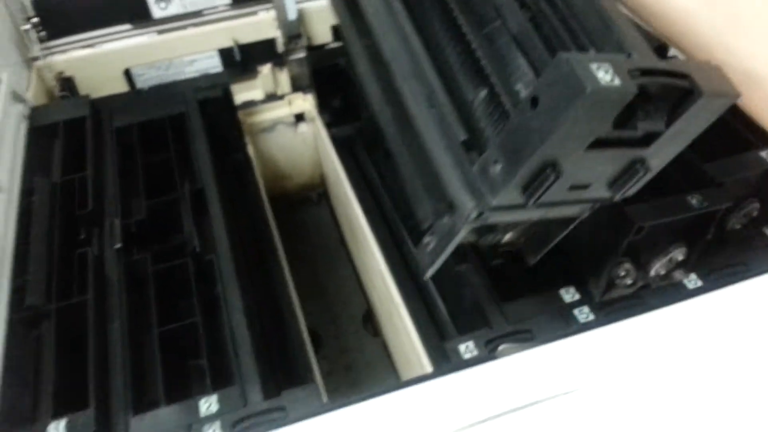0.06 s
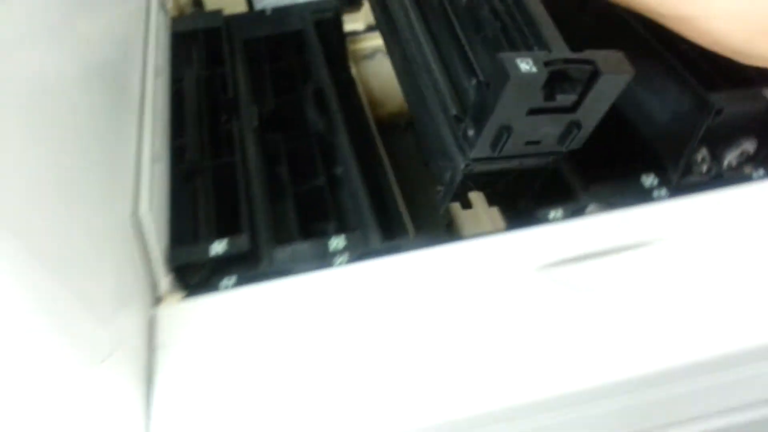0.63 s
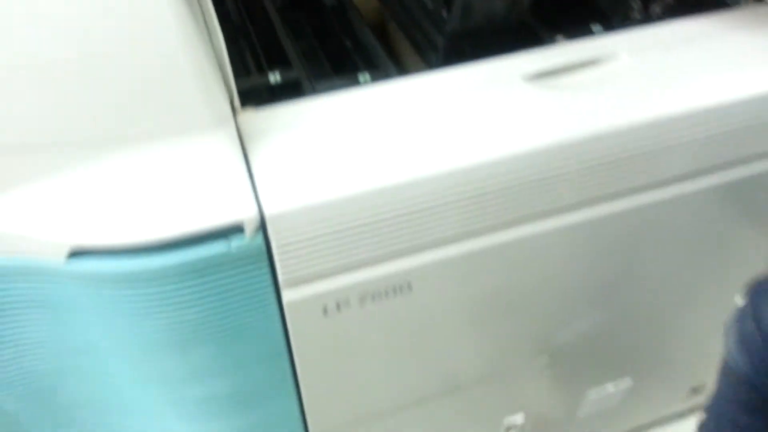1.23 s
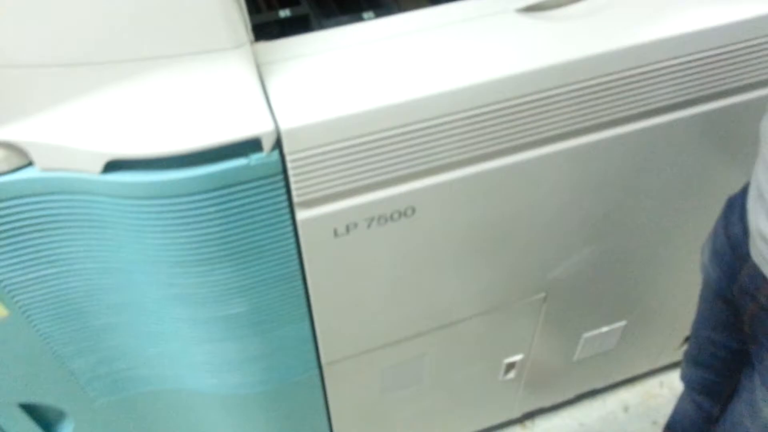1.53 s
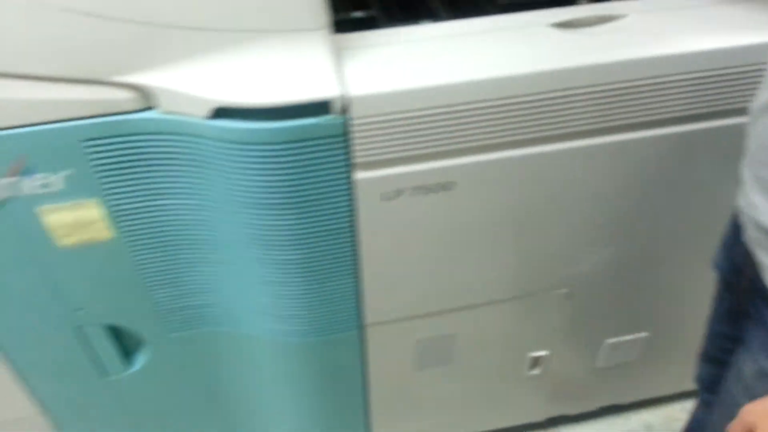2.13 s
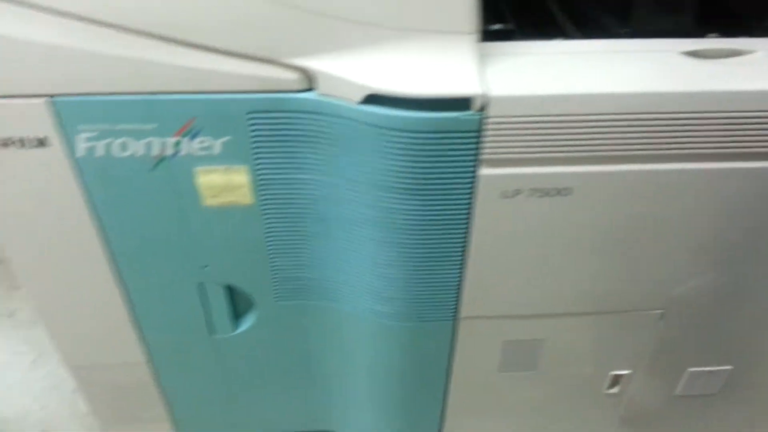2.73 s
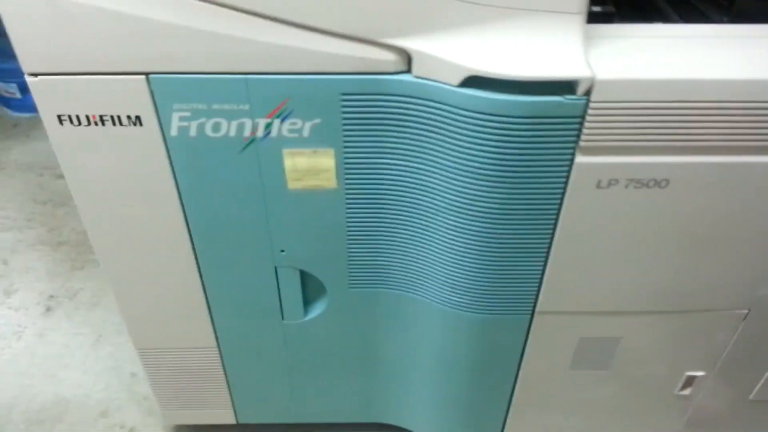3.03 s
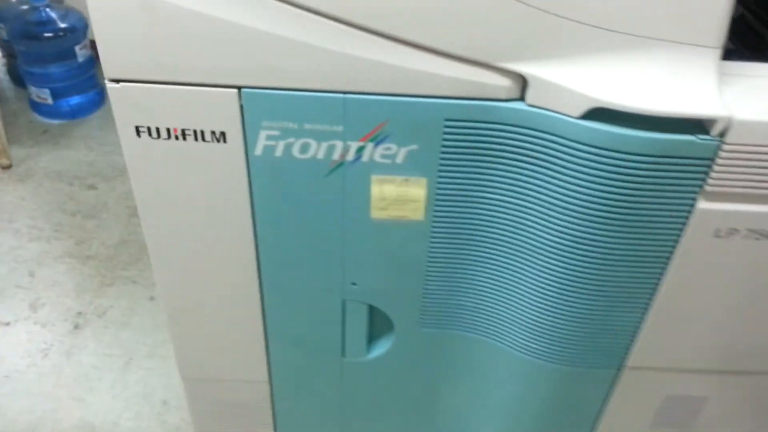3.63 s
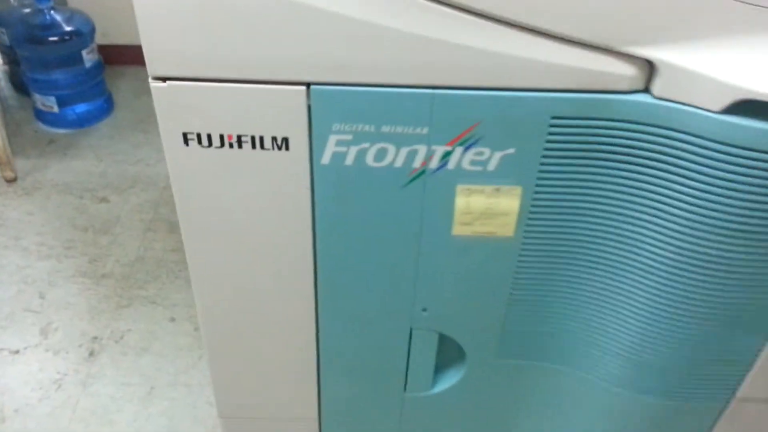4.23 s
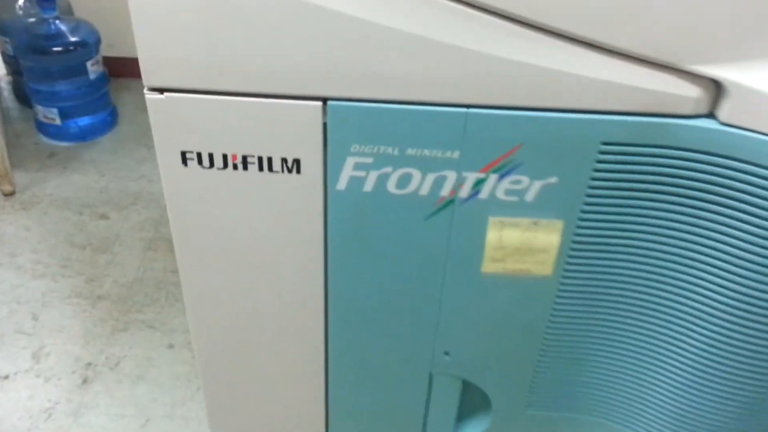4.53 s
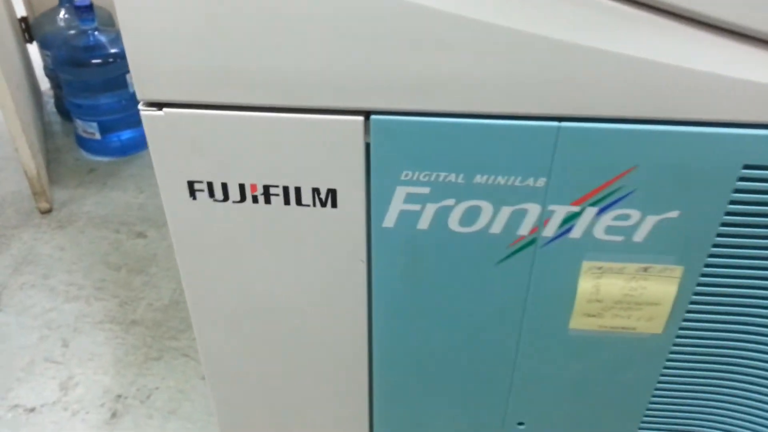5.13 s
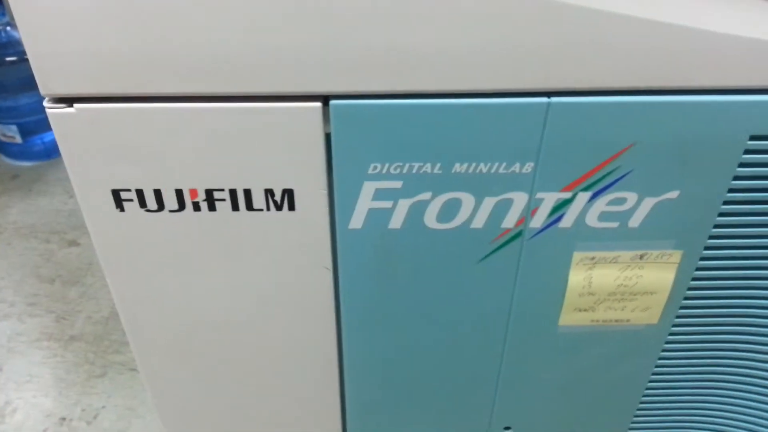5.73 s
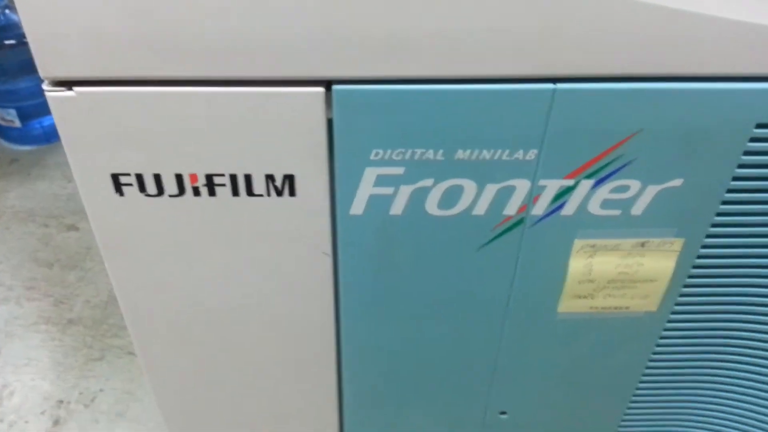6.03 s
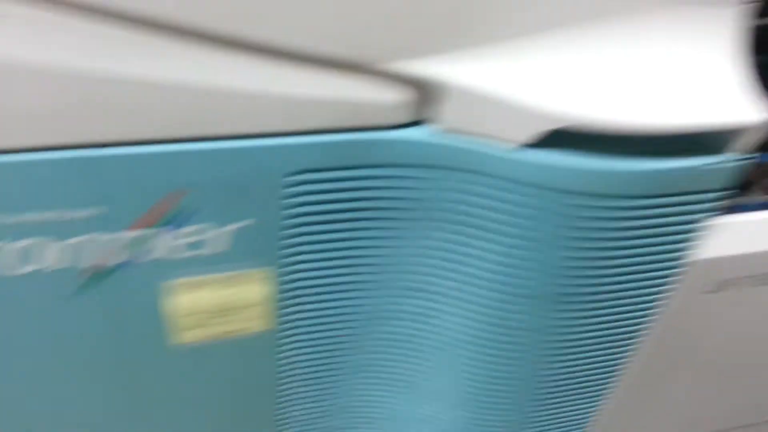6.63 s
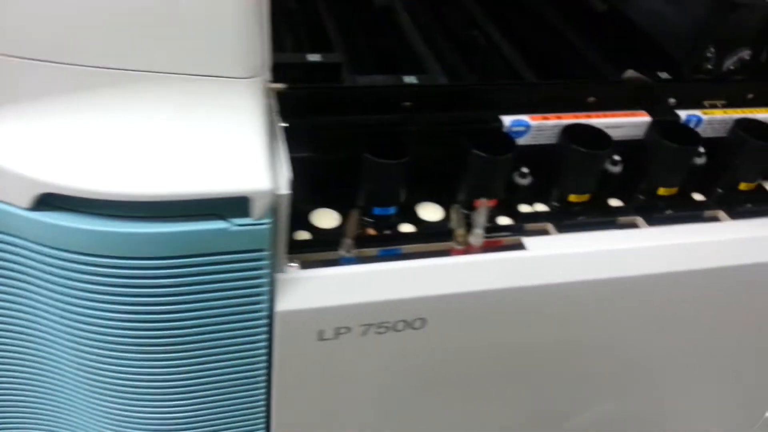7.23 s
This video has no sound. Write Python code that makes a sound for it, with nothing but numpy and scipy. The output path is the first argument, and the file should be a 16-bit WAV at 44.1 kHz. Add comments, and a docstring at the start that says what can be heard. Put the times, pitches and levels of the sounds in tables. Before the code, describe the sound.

In a workshop with a faint rush of ventilation, plastic racks clatter against a machine's housing. Quick, irregular knocks each trail a short rattle and a slight ring, with jostling in between. The bright clicks give way to hollower knocks, moving from the centre to the left. After about five seconds it quiets to small taps, plastic sliding on plastic and a few ticks from the hand-held recorder's case close to the microphones.

```python
"""Plastic racks in a workshop

Hard plastic racks are lifted, knocked and seated in the housing of a large machine. Each knock is a
graze, a hit and a rattle of loose parts, ringing in the ribbed rack, the housing and the room; between
knocks the racks jostle and slide. The hand-held stereo recorder turns away, so the racks drift to its
left. Close to the microphones its case ticks softly in the grip; ventilation hums behind."""
import sys
import numpy as np
from scipy import signal
from scipy.fft import rfft, irfft, next_fast_len
from scipy.io import wavfile

SR = 44100
rng = np.random.default_rng(int(sys.argv[2]) if len(sys.argv) > 2 else 0)


def dump(signal):
    """Clip the signal to [-1, 1] and save it as 16-bit WAV at the path in sys.argv[1]."""
    limited = np.clip(np.atleast_2d(signal).T, -1, 1)
    pcm = np.round(limited * 32767).astype(np.int16)
    wavfile.write(sys.argv[1], SR, pcm)


N = 321048
TIME = np.arange(N) / SR
PORT_DELAY_S = 0.00043   # sound's travel time between the two microphone ports
CUTOFF_HZ = 14800

# colour of the racks in their housing: (frequency [Hz], gain [dB])
RACK_COLOUR = [(40, -35), (90, -53), (160, -22.5), (280, -8), (360, -6.5), (700, 0), (1050, -1.5),
               (2100, 3), (2800, -1), (3700, 3), (4700, -4), (5700, -10), (10000, -15), (14000, -31.5)]
# where the racks lie, seen from the microphones: (time [s], bearing [sine of the angle to the left])
RACK_BEARING = [(0, 0.043), (2.2, 0.021), (2.55, 0.066), (3.2, 0.45), (4.03, 0.52), (4.65, 0.75),
                (5.7, 0.93), (6.5, 0.53), (7.28, 0.32)]


def knocks(rise_t60=0.0015, crack_t60=0.019, housing_t60=0.12, housing_db=5.5):
    """Each blow feeds the rack's crowded modes, heard directly and scattered by the housing."""
    # (time [s], graze before the hit [s], rattle length [s], main resonance [Hz],
    #  relative strength [dB], hardness [below 0 dull, above 0 bright])
    blows = [(0.688, 0.019, 0.29, 3700, 4.5, 0.9), (.943, 0.0032, 0.084, 1730, 10.5, -3),
             (1.079, 0.00042, 0.12, 4500, 16, 0.5), (1.094, 0.0011, 0.026, 4470, 19, 1.5),
             (1.111, 0.00066, 0.19, 2360, 19, 0.5), (1.206, 0, .38, 2180, 12, -.3),
             (1.44, 0.015, 0.11, 1680, 21, 0.75), (1.554, 0, 0.075, 1990, 13.5, -2.2),
             (1.788, 0.0087, 0.37, 855, 13.5, -1.5), (1.897, 0.017, 0.15, 1900, 22.5, 0.17),
             (2.059, 0.00068, 0.19, 870, 16.5, -1.7), (2.092, 0.013, 0.17, 1910, 26, -0.5),
             (2.173, 0, 0.05, 2700, 30.5, 0.45), (2.191, 0, 0.27, 2060, 23.5, -0.7),
             (2.355, .004, 0.12, 615, 25.5, -1.2), (2.394, 0.0036, 0.051, 684, 17.5, -1.5),
             (2.513, 0.032, 0.074, 2820, 25, -0.65), (2.536, 0.0031, 0.34, 720, 25, -1.5),
             (2.763, 0, 0.13, 975, 3.5, 1.5), (2.993, 0.0095, 0.083, 1490, 8.5, -2.5),
             (3.2, 0.0066, 0.14, 4160, 18, -1.5), (3.441, 0.0042, 0.21, 630, 15.5, -1.1),
             (3.479, 0.00078, 0.3, 1500, 15.5, -2.4), (3.602, 0.007, 0.18, 860, 22.5, -1.5),
             (3.744, 0.0083, 0.065, 3650, 6, -0.3), (3.873, 0, 0.13, 537, 9.5, -1),
             (3.89, 0.0012, 0.087, 445, 14.5, -3.5), (3.903, 0.016, 0.061, 500, 20.5, -3),
             (3.916, 0.0021, 0.16, 870, 19, -2), (4.03, 0.0034, 0.069, 880, 19, -2.2),
             (4.065, 0.0018, 0.1, 485, 17, -2.5), (4.312, 0.00084, 0.27, 1070, 4, 0),
             (4.6217, .003, 0.072, 1270, 27, 0.34), (4.665, 0, 0.24, 1140, 21, 0),
             (4.879, 0.0092, 0.12, 895, 22.5, -1.1), (4.957, .005, 0.29, 750, 22.5, -1.96),
             (4.97, 0, 0.075, 1270, 20.5, -1.7), (4.989, 0, 0.099, 530, 11, -6.5),
             (5.091, 0, 0.023, 810, 9, -3.5), (5.243, 0, 0.18, 766, 1, -5.5),
             (5.41, 0, 0.026, 1080, -3, -3.5), (5.727, 0.0089, 0.046, 740, 4.5, 2.5),
             (5.793, 0.0048, 0.038, 950, 0.5, -2), (5.991, 0, 0.11, 4270, 1.5, 0),
             (6.494, 0.0077, 0.11, 3030, 2, -2.5), (6.571, 0.011, 0.089, 940, 1, -2),
             (6.601, 0, 0.15, 1090, -5.5, -6), (6.913, 0.0044, 0.13, 4530, 2.5, -0.5)]
    out, t = np.zeros((2, N)), TIME[:2 ** 14]
    for s, graze_s, rattle_s, main_hz, db, hardness in blows:
        energy = dying(blow(t, graze_s, rattle_s, hardness), rise_t60)
        crack = rng.standard_normal(len(t)) * np.sqrt(dying(energy, crack_t60))
        scattered = diffuse(len(t)) * np.sqrt(dying(energy, housing_t60))
        knock = unit(from_racks(crack, s) + from_db(housing_db) * scattered)
        knock = coloured(knock, RACK_COLOUR, struck_spot(main_hz, hardness), hardened(hardness))
        add(out, s - graze_s, from_db(db) * knock)
    return out


def blow(t, graze_s, rattle_s, hardness, graze_db=-5.5, settle_db=-11, settle_t60=1, scuff_s=0.25):
    """Energy of one knock over time: graze, hit, dying rattle, and loose parts chattering on."""
    lead = round(graze_s * SR)
    since_hit = np.maximum(t - t[lead], 0)
    collisions = contacts(len(t), per_s=780, spread_db=1.0)
    swell = 1 - np.exp(-since_hit / (0.022 * rattle_s))   # long rattles swell for longer
    energy = shared_out(collisions * (swell * fade(since_hit, rattle_s)) ** 2, 0)
    energy += shared_out(collisions * (swell * fade(since_hit, settle_t60)) ** 2, settle_db)
    pressing = ((np.arange(lead) + 1) / (lead + 1)) ** 0.65   # the rack scrapes in ever harder
    energy[:lead] += shared_out(pressing, graze_db)
    # hard contacts put more into the first hit; a long scuff puts in less
    energy[lead] += from_db(1.5 * hardness) ** 2 / (1 + (rattle_s / scuff_s) ** 2)
    return energy


def struck_spot(main_hz, hardness, width=0.075):
    """Each spot of a rack favours one broad resonance and many narrow ones: (frequency [Hz], gain [dB])."""
    hz = 200 + 14000 * np.linspace(0, 1, num=170) ** 1.6
    narrow_db = rng.normal(-1, 3.2, len(hz))
    broad_db = (7 + 0.1 * hardness) / (1 + (np.log(hz / main_hz) / width) ** 2)
    return np.column_stack([hz, narrow_db + broad_db])


def hardened(hardness):
    """A harder contact tilts the sound towards the treble."""
    # (frequency [Hz], gain per unit of hardness [dB])
    tilt = [(150, -0.2), (330, -2), (800, -1.9), (1700, 0.5), (4000, 2.03), (9000, 2.5), (14800, 6)]
    return [(hz, hardness * db) for hz, db in tilt]


def jostling(touch_t60=0.11):
    """Light, soft touches of rack on housing come at random while it is moved."""
    # how hard the racks are jostled: (time [s], level [dB])
    effort = [(.6, -68), (1.0, -61), (1.22, -33.5), (1.38, -45.5), (1.63, -31.5), (2.0, -47), (2.32, -27.5),
              (2.68, -40), (2.94, -32.5), (3.15, -40.5), (3.28, -35), (3.55, -37), (3.8, -33.5),
              (4.2, -41.5), (5.5, -82)]
    touches = diffuse(N) * np.sqrt(dying(contacts(N, per_s=130, spread_db=2.0), touch_t60))
    touches = coloured(touches, RACK_COLOUR, hardened(-2.1))
    return from_db(np.interp(TIME, *np.transpose(effort))) * unit(touches) * np.sqrt(N)


def snaps():
    """Stiff plastic catches snap over an edge."""
    # (time [s], level [dB], pitch [Hz], t60 [s])
    catches = [(.6895, -25.5, 3700, 0.026), (1.0932, -4, 4020, 0.028), (1.1128, -10.5, 3550, 0.05),
               (1.439, -41, 9400, 0.032), (1.5532, -16, 2600, 0.044), (2.172, -14, 3340, 0.052),
               (3.469, -15, 10300, .025), (3.4775, -15, 10400, 0.039), (3.611, -29, 11500, 0.0083),
               (4.6228, -17, 3340, 0.033)]
    return slips(catches, width=1.49, scatter=1.0)


def ringing(hits):
    """Panels and rollers ring on at their own pitches."""
    # modes that outlast a knock: (frequency [Hz], relative gain [dB], t60 [s])
    modes = [(289, 10.5, 0.91), (672, -3.5, 0.66), (802, -11, 0.049), (1260, 6.5, 0.88), (1730, 16, 0.56),
             (2100, 5, 0.073), (2700, 10, 0.17), (3020, 7.5, 0.13), (3760, 1, 0.13), (4520, 8, 0.17),
             (6906, -19, .25), (7720, 13, 0.03)]
    out = 0
    for hz, db, t60 in modes:
        r = fade(1 / SR, t60)
        feedback = [1, -2 * r * np.cos(2 * np.pi * hz / SR), r * r]
        out = out + from_db(db) * signal.lfilter([1 - r, 0, r - 1], feedback, hits + 1e-18)
    return out


def clinks():
    """A small metal part is struck and rings high."""
    # strikes: (time [s], strength [dB])
    hits = [(.689, -40), (3.199, -27)]
    # the part's modes: (frequency [Hz], relative level [dB], t60 [s])
    modes = [(3400, 6, 0.088), (3990, 12.5, 0.054), (4220, 1, 0.23), (4250, -2.5, 0.38), (5200, 4.5, 0.068),
             (5400, -12, 0.33), (7500, -17, 0.7)]
    return struck(hits, modes, contact_s=0.0011)


def thud():
    """A rack lands on the housing floor and sounds its low modes."""
    # landing: (time [s], strength [dB])
    hits = [(3.602, -21)]
    # the floor's modes: (frequency [Hz], relative level [dB], t60 [s])
    modes = [(200, -32, 0.13), (236, -2.5, 0.14), (281, 0, 0.25)]
    return struck(hits, modes, contact_s=0.0042)


def sliding(grain_t60=0.037):
    """Plastic rubs on plastic: dense little slips, each a brief rustle of the rack."""
    # pushes: (start [s], length [s], level [dB])
    pushes = [(.31, 0.05, -47.5), (4.34, 0.12, -36), (5.08, 0.055, -27.5), (6.54, 0.19, -42.5),
              (6.94, 0.18, -41.5), (7.08, 0.36, -31.5)]
    # colour of the friction: (frequency [Hz], gain [dB])
    colour = [(100, -49), (300, -14.5), (800, -1), (1400, 3), (2200, 2), (3500, 3.5), (4900, 4), (6200, -7),
              (10000, -7.5), (14000, -20)]
    rustle = diffuse(N) * np.sqrt(dying(contacts(N, per_s=1700, spread_db=-2.0), grain_t60))
    return strokes(pushes) * unit(coloured(rustle, colour)) * np.sqrt(N)


def squeak(hz=3400, width=1.09):
    """A roller squeaks thinly: fast uneven slips excite one narrow resonance."""
    # the rack is drawn along: (start [s], length [s], level [dB])
    pulls = [(4.19, 0.044, -45), (4.36, 0.082, -39.5)]
    roller = band_pass(hz / width, hz * width)
    return strokes(pulls) * unit(signal.sosfilt(roller, diffuse(N))) * np.sqrt(N)


def case_ticks(t60=0.027, body_hz=800, body_db=-11, rebound_s=0.014, rebound_db=-8):
    """Right at the microphones the gripped case ticks, sounds its hollow body and springs back."""
    # (time [s], level [dB], pitch [Hz])
    ticks = [(6.142, -32, 4530), (6.236, -29.5, 3150), (6.2558, -23, 3100), (6.317, -33, 3060),
             (6.601, -23.5, 725)]
    parts = []
    for s, db, hz in ticks:
        parts += [(s, db, hz, t60), (s, db + body_db, body_hz, t60)]
        parts.append((s + rebound_s, db + rebound_db, hz, t60))
    return slips(parts, width=1.17, scatter=0.33)


def workshop(racks, build_t60=0.01):
    """Each band fills the room and dies away; the recorder moves, so the tail's grain never repeats."""
    # the room's reverberation: (frequency [Hz], t60 [s])
    decay = [(150, 0.88), (400, 0.25), (1000, 0.51), (2800, 0.46), (7000, 0.41), (14000, 0.13)]
    out, air = 0, [diffuse(N), diffuse(N)]
    edges = np.geomspace(100, CUTOFF_HZ, num=15)
    for k, (low, high) in enumerate(zip(edges, edges[1:])):
        band = band_pass(low, high)
        power = np.mean(signal.sosfilt(band, racks) ** 2, axis=0)
        stored = dying(dying(power, build_t60), at_hz(decay, np.sqrt(low * high)))
        out = out + unit(signal.sosfilt(band, air[k % 2])) * np.sqrt(N * stored)
    return out


def ventilation(rush_db=-43):
    """Room tone behind the racks: a steady rush of air with faint fan tones."""
    # colour of the moving air: (frequency [Hz], gain [dB])
    colour = [(18, -25), (30, -43.5), (193, -16), (220, -10), (292, -4.5), (378, -5.5), (516, -3),
              (1010, 2), (1240, -1.5), (1340, -0.5), (1700, -4.5), (1930, -3), (5570, -16.5), (14500, -20)]
    # fan tones: (frequency [Hz], level [dB])
    tones = [(296, -65), (877, -60), (1308, -61.5)]
    rush = from_db(rush_db) * unit(coloured(diffuse(N), colour)) * np.sqrt(N)
    hum = sum(from_db(db) * np.sin(2 * np.pi * (hz * TIME + rng.random())) for hz, db in tones)
    return rush + np.sqrt(2) * hum


def struck(hits, modes, contact_s):
    """A struck part rings with a few clear, unrelated partials; a soft contact brings them in gently."""
    out, t = np.zeros((2, N)), TIME[:SR // 2]
    ring = sum(from_db(db) * np.sin(2 * np.pi * hz * t) * fade(t, t60) for hz, db, t60 in modes)
    ring *= 1 - np.exp(-(t / contact_s) ** 2)
    for s, db in hits:
        add(out, s, from_racks(from_db(db) * ring, s))
    return out


def slips(events, width, scatter):
    """Plastic sticks and lets go: a short rough burst in a broad resonance, partly scattered."""
    out, t = np.zeros((2, N)), TIME[:4096]
    for s, db, hz, t60 in events:
        shell = band_pass(hz / width, min(hz * width, CUTOFF_HZ))
        envelope = fade(t, t60)
        burst = (rng.standard_normal(len(t)) + scatter * diffuse(len(t))) * envelope
        add(out, s, from_db(db) * unit(signal.sosfilt(shell, burst)) * np.linalg.norm(envelope))
    return out


def strokes(pushes, swell_share=0.3, release_t60=0.33):
    """Each push gathers speed, holds and dies away."""
    envelope = 0
    for s, length, db in pushes:
        speed = np.clip((TIME - s) / (swell_share * length), 0, 1)
        envelope += from_db(db) * speed * fade(np.maximum(TIME - s - length, 0), release_t60)
    return envelope


def contacts(size, per_s, spread_db):
    """Energies of random tiny collisions of uneven strength."""
    strength = from_db(spread_db * np.minimum(rng.exponential(1, size), 4))
    return strength ** 2 * (rng.random(size) < per_s / SR)


def from_racks(x, s, shade_db=4.0):
    """Direct sound from the racks' bearing at time s reaches the far microphone later and weaker."""
    bearing = np.interp(s, *np.transpose(RACK_BEARING))
    delay = np.exp(-2j * np.pi * np.fft.rfftfreq(len(x), 1 / SR) * PORT_DELAY_S * bearing)
    shade = from_db(shade_db * bearing * np.array([[1], [-1]]))
    return np.array([x, irfft(rfft(x) * delay, len(x))]) * shade


def diffuse(size, arc=0.87):
    """Scattered noise: the two microphones agree in the bass and part in the treble."""
    alike = 0.97 * np.sinc(2 * np.fft.rfftfreq(size, 1 / SR) * PORT_DELAY_S * arc)
    mid, side = rfft(rng.standard_normal((2, size)))
    mid, side = mid * np.sqrt((1 + alike) / 2), side * np.sqrt((1 - alike) / 2)
    return irfft(np.array([mid + side, mid - side]), size)


def coloured(x, *spectra):
    """Causal (minimum-phase) filter with the summed dB of the given spectra."""
    size = 2 * next_fast_len(x.shape[-1] // 2 + 1024)
    hz = np.fft.rfftfreq(size, 1 / SR)
    gain = from_db(sum(at_hz(points, hz) for points in spectra))
    cepstrum = irfft(np.log(gain))
    cepstrum[1:size // 2] *= 2
    cepstrum[size // 2 + 1:] = 0
    return irfft(rfft(x, size) * np.exp(rfft(cepstrum)))[..., :x.shape[-1]]


def band_pass(low_hz, high_hz):
    """Filter sections for one gently sloped band."""
    return signal.butter(2, [low_hz, high_hz], "band", fs=SR, output="sos")


def dying(power, t60):
    """Energy stored in a body or a room leaks away."""
    r = fade(1 / SR, t60) ** 2
    return signal.lfilter([1 - r], [1, -r], power + 1e-18)


def fade(t, t60):
    """Exponential decay, 60 dB down after t60."""
    return np.exp(-np.log(1000) * t / t60)


def shared_out(energy, db):
    """Scale a run of collisions to a total energy in dB."""
    return from_db(db) ** 2 * energy / (energy.sum() + 1e-20)


def unit(x):
    """Scale to a mean energy of one per channel."""
    return x / np.sqrt(np.mean(np.sum(x ** 2, axis=-1)) + 1e-20)


def from_db(db):
    """Decibels to gain."""
    return 10 ** (np.asarray(db) / 20)


def at_hz(points, hz):
    """Read a table on a log-frequency axis."""
    known, values = np.transpose(points)
    return np.interp(np.log(hz + 1), np.log(known), values)


def add(out, s, sound):
    """Mix a stereo sound in at time s."""
    start = round(s * SR)
    out[:, start:start + sound.shape[-1]] += sound[..., :N - start]


def scene(knock_db=-0.47, ring_db=-11.5, room_db=-7):
    """Racks out in the room, the case close to the microphones, air behind."""
    hits = from_db(knock_db) * knocks() + jostling() + snaps()
    racks = hits + from_db(ring_db) * ringing(hits) + clinks() + thud() + sliding() + squeak()
    return racks + from_db(room_db) * workshop(racks) + case_ticks() + ventilation()


def record(dry, ceiling=10.0):
    """The recorder rounds the hardest peaks and cuts the highest treble."""
    treble_cut = signal.ellip(10, 0.2, 70, CUTOFF_HZ, fs=SR, output="sos")
    return signal.sosfilt(treble_cut, ceiling * np.tanh(dry / ceiling))


dry = scene()
out = record(dry)
dump(out)
```